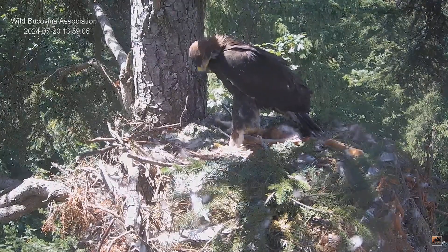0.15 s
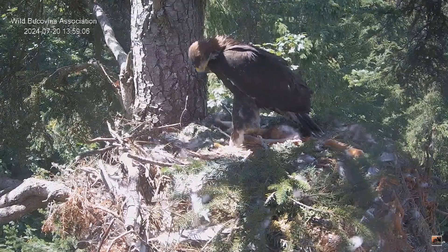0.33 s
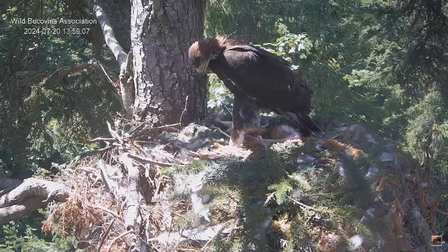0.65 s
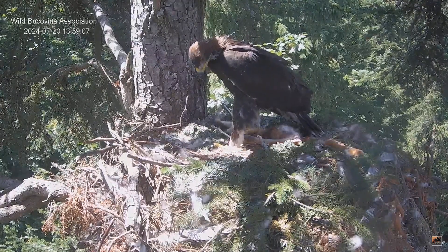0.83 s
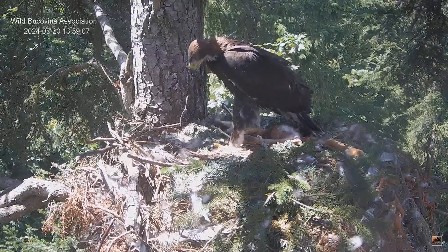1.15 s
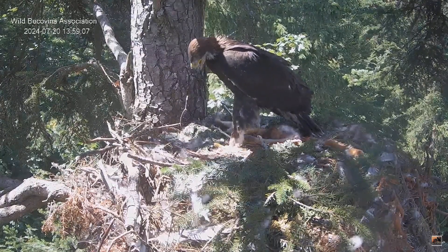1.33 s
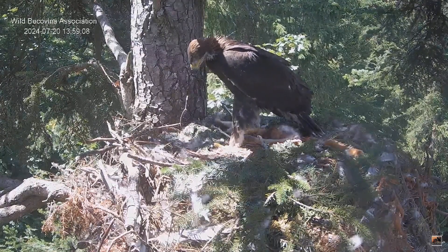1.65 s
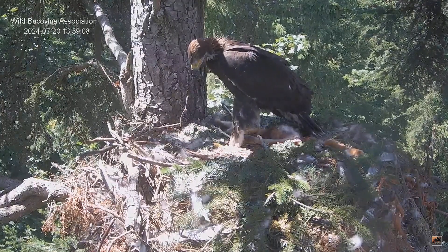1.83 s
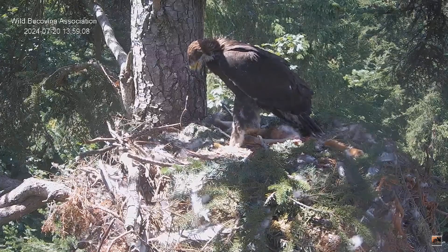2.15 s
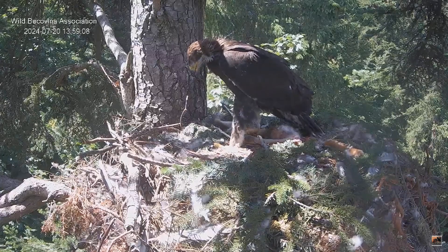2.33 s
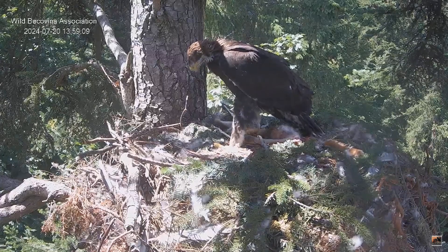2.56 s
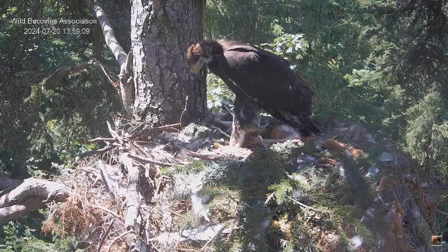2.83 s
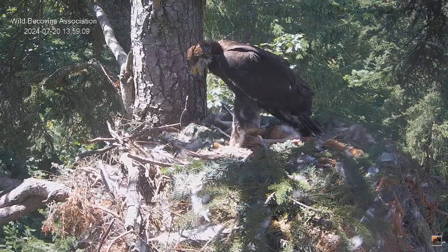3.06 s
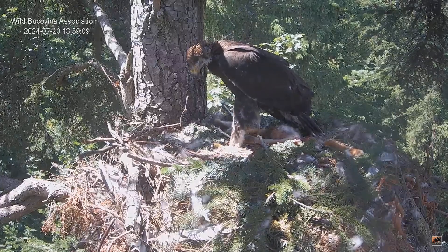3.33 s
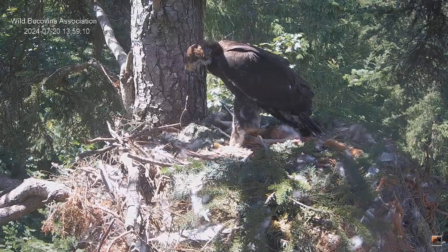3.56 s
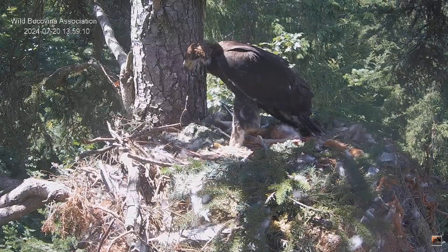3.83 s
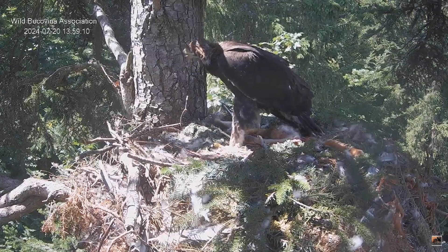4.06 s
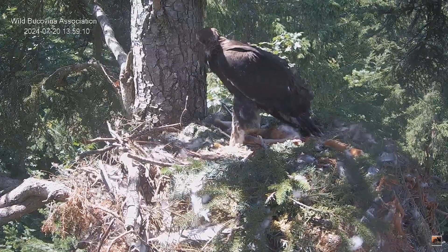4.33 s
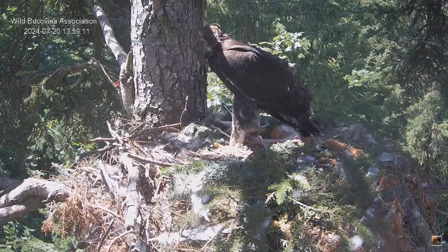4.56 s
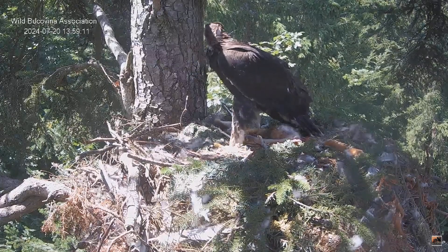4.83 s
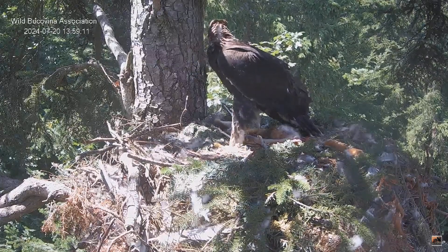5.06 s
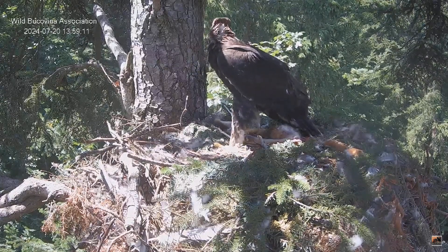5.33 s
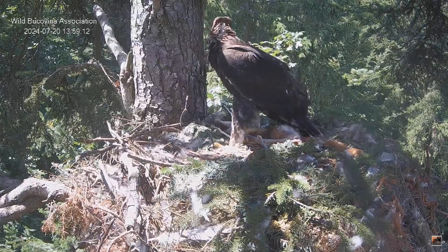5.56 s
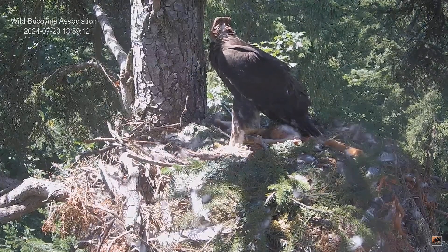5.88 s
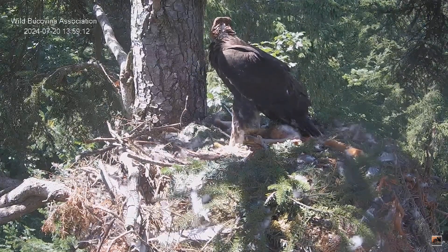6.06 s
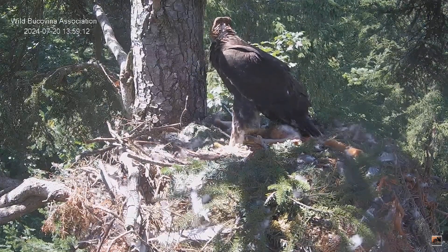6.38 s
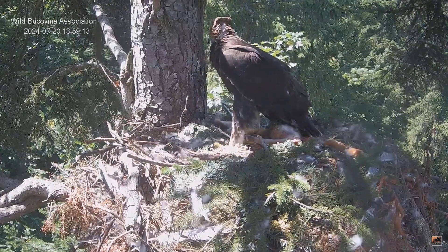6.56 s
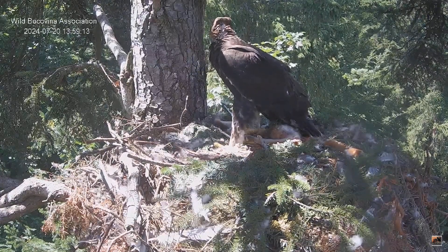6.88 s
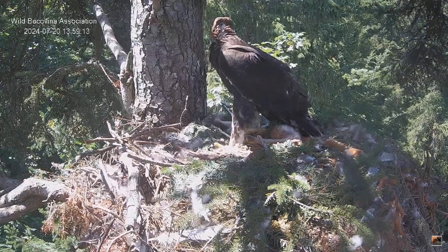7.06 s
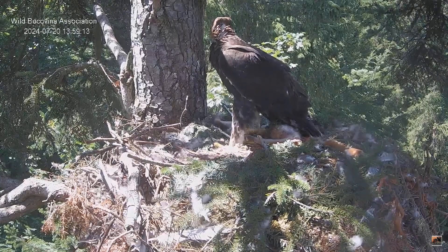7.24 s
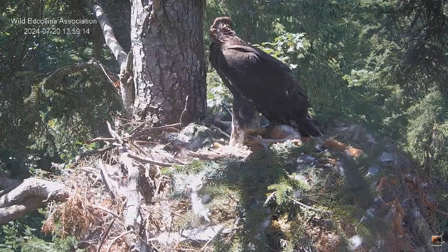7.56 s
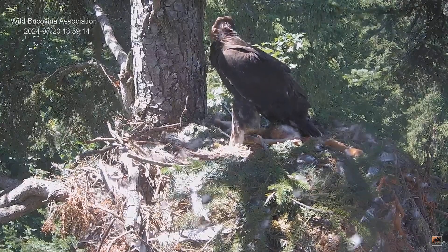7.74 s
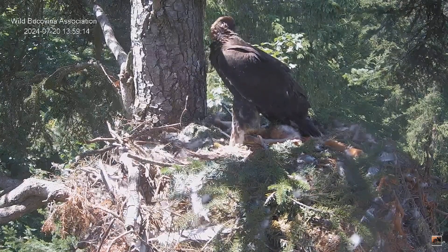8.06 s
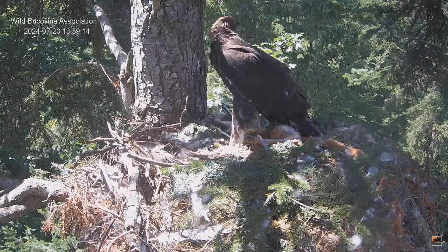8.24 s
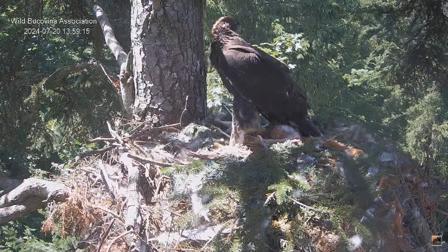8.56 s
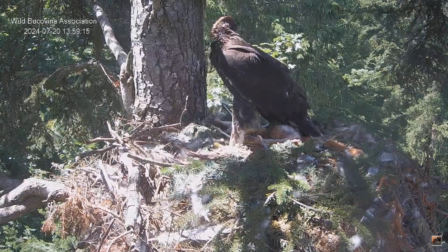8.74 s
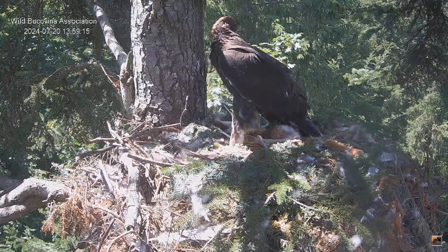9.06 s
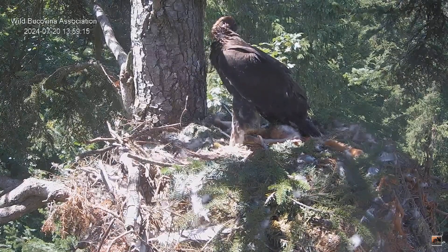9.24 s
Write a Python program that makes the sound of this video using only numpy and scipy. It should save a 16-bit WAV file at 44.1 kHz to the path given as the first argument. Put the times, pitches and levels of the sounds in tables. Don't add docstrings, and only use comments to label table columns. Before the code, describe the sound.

At 0 s the buzzy tail of a young eagle's cry is just fading, while a few very faint croaks sound far off until 0.3 s. From 0.4 s the close bird gives twelve begging calls, at about 0.4, 1.3, 2.1, 2.9, 3.8, 4.5, 5.2, 5.9, 6.7, 7.4, 8.1 and 8.8 s. Each lasts around 0.4 s: a tiny throat creak, a fast upward catch into a loud, nearly pure whistle near 4.7 kHz, creeping higher for 0.2 s, then a sudden crack down through a brief note near 2.3 kHz to a raspy, drooping one near 1.3 kHz. After 4.3 s the head turns away, so the low tails dull and soft forest echoes show more. Another faint croak comes near 4.9 s. Low wind thumps swell gently underneath, strongest around 4.6, 6.9, 7.9 and 9.1 s, over a faint airy floor.

```python
import sys
import numpy as np
from scipy import signal
from scipy.fft import rfft, irfft, next_fast_len
from scipy.io import wavfile
from scipy.ndimage import uniform_filter1d, minimum_filter1d, map_coordinates

SR = 44100
rng = np.random.default_rng(int(sys.argv[2]) if len(sys.argv) > 2 else 0)


def convert_level_to_amplitude(level_db):
    exponent = np.asarray(level_db, float) / 20
    return 10 ** exponent


def wav_out(sig):
    wavfile.write(sys.argv[1], SR, np.round(np.clip(np.atleast_2d(sig).T, -1, 1) * 32767).astype(np.int16))


N = 414981
TIME = np.arange(N) / SR
OVERLAP_S = 0.0086

# start_s, snap_s, rise_s, settling_pitch_hz, last_pitch_hz
WHISTLE_CALLS = [(0.388, 0.611, 0.027, 4637, 4820), (1.255, 1.488, 0.031, 4660, 4842),
                 (2.1, 2.329, 0.031, 4654, 4815), (2.895, 3.115, 0.025, 4646, 4839),
                 (3.766, 3.994, 0.039, 4776, 4884), (4.52, 4.75, 0.022, 4655, 4848),
                 (5.191, 5.418, 0.022, 4660, 4968), (5.892, 6.125, 0.019, 4707, 5013),
                 (6.69, 6.918, 0.025, 4650, 5013), (7.38, 7.601, 0.022, 4782, 4946),
                 (8.064, 8.298, 0.019, 4766, 4973), (8.795, 9.032, 0.021, 4696, 5018)]
# octave_db, half_pitch_line_db, flutter_db, air_db
WHISTLE_COMPANIONS = [(-28, -48.5, -63.5, -42.5), (-28, -54, -64, -46), (-28.5, -51, -65.5, -44.5),
                      (-25.5, -41, -61, -40), (-28, -38, -66.5, -42), (-24, -44.5, -80.5, -45),
                      (-29, -50.5, -64, -52.5), (-30, -53, -61, -49), (-29.5, -59, -60.5, -49),
                      (-31.5, -52, -42.5, -44), (-35.5, -58, -51.5, -47), (-36, -76, -58, -44.5)]
# peak_s, peak_db, rise_s, fall_s
AIR_PUSHES = [(0.403, -23.0, 0.008, 0.005), (0.414, -22.5, 0.0031, 0.0048), (0.423, -20.0, 0.0064, 0.13),
              (0.596, -8.5, 0.077, 0.004), (1.287, -12.5, 0.019, 0.01), (1.303, -13.5, 0.009, 0.023),
              (1.335, -8.0, 0.021, 0.041), (1.387, -9, 0.027, 0.029), (1.447, -3.5, 0.045, 0.033),
              (2.122, -21.5, 0.013, 0.017), (2.146, -9.5, 0.015, 0.041), (2.151, -13.5, 0.0064, 0.05),
              (2.314, -11.5, 0.13, 0.02), (2.924, -16, 0.017, 0.17), (3.033, -5, 0.094, 0.019),
              (3.058, -4, 0.023, 0.062), (3.093, -6, 0.035, 0.037), (3.795, -12.5, 0.02, 0.0053),
              (3.809, -15.0, 0.0093, 0.038), (3.84, -7.5, 0.034, 0.1), (3.975, 2, 0.086, 0.012),
              (4.566, -13.5, 0.023, 0.074), (4.728, -11.0, 0.059, 0.047), (5.204, -24.5, 0.012, 0.014),
              (5.22, -15.5, 0.0069, 0.019), (5.317, -9, 0.082, 0.068), (5.394, -12.5, 0.075, 0.038),
              (5.897, -28, 0.006, 0.022), (5.927, -12.5, 0.017, 0.016), (6.01, -7.5, 0.065, 0.028),
              (6.069, -13.5, 0.035, 0.018), (6.102, -22.5, 0.023, 0.01), (6.709, -28.5, 0.009, 0.016),
              (6.734, -11, 0.017, 0.04), (6.823, -8.5, 0.045, 0.042), (6.892, -13, 0.029, 0.022),
              (7.392, -23.5, 0.01, 0.017), (7.418, -9.5, 0.019, 0.013), (7.445, -9.5, 0.012, 0.035),
              (7.55, -15.5, 0.064, 0.019), (7.577, -23, 0.019, 0.008), (7.592, -19, 0.0069, 0.08),
              (8.101, -7.5, 0.023, 0.017), (8.128, -15.5, 0.019, 0.085), (8.226, -17.5, 0.036, 0.041),
              (8.278, -10.0, 0.042, 0.01), (8.806, -22.5, 0.005, 0.032), (8.839, -7, 0.028, 0.021),
              (8.855, -23.5, 0.017, 0.059), (8.994, -11.0, 0.085, 0.042)]
# time_s, bend_hz, width_s
PITCH_BENDS = [(.45, 71.5, .03), (.55, -21.5, .03), (1.32, 49, .02), (1.436, 86.5, .028), (2.168, 61, .025),
               (2.937, 59.5, 0.016), (3.061, -18.5, 0.031), (3.833, 110.5, .02), (4.589, 18.5, 0.043),
               (5.24, 40, .02), (5.94, -50, .012), (6.09, 41, .02), (6.871, -26, .03), (7.47, 29.5, .03),
               (8.18, -35.5, .04), (8.91, -38, .03), (9, 39, 0.023)]
# jolt_db, midway_pitch_hz, crack_foot_db, middle_octave_db
VOICE_BREAKS = [(-31, 3900, -19.5, -8), (-12, 3250, -21.5, -6), (-10.5, 3200, -12.5, -12.5),
                (-18.5, 4100, -10, -23.5), (-18, 3300, -10, -11), (-12.5, 2700, -15.5, 1),
                (-16, 3250, -11, -6.5), (-7.5, 3100, -7.5, -7), (-10, 3150, -6.5, -10), (-9, 3050, 1.5, 2),
                (-9, 3250, -15.5, -4), (-28, 3400, -15.5, -5.5)]
# landing_s, end_s, pitch_hz, landing_db, last_db
MIDDLE_NOTES = [(0.638, 0.659, 2445, -7, -11), (1.511, 1.528, 2473, -13, -11.5),
                (2.37, 2.385, 2465, -4, -18.5), (3.162, 3.173, 2430, -14.5, -10.5),
                (4.027, 4.075, 2348, -10, -13), (4.785, 4.832, 2260, -14.5, -18),
                (5.464, 5.512, 2166, -7.5, -12), (6.172, 6.21, 2140, -6.5, -6),
                (6.971, 7.019, 2136, -0.5, -6), (7.651, 7.689, 2187, -22, -6.5),
                (8.338, 8.378, 2207, -6.5, -3.5), (9.067, 9.111, 2214, 0.5, -8)]
# end_s, first_pitch_hz, last_pitch_hz, level_db, octave_db
LOW_NOTES = [(0.062, 1540, 1186, -23, 3.5), (0.743, 1651, 1237, -10, 4), (1.621, 1688, 1207, -10.5, 2.5),
             (2.465, 1670, 1226, -13, 2), (3.26, 1700, 1263, -15, 4.5), (4.144, 1509, 1114, -16.5, 5),
             (4.881, 1428, 1159, -22, 4.5), (5.561, 1371, 1093, -21, 5), (6.261, 1380, 1120, -19, 5),
             (7.063, 1345, 1080, -20.5, 4), (7.739, 1372, 1111, -16.5, 7.5),
             (8.437, 1406, 1100, -23.5, 5.5), (9.165, 1402, 1143, -22.5, 5)]
# beak_toward_microphone_db, half_pitch_lines_db
HEAD_POSES = [(-0.5, -22), (2, -17), (1.5, -10), (1, -7.5), (-0.5, -5), (-1.5, -41.5), (-0.5, -21),
              (-9, -20.5), (-12, -16.5), (-11.5, -16.5), (-6, -24), (-7.5, -19), (-7, -18)]
# frequency_hz, level_db
THROAT_SPECTRUM = [(700, -32.5), (1500, -13.5), (3200, -4), (4600, -7.5), (6300, -6), (8200, -10),
                   (10500, -21), (14500, -39)]
# frequency_hz, level_db
BREATH_SPECTRUM = [(1300, -38), (2200, -24), (3600, -13), (4800, -1), (5800, -7), (7600, -4.5),
                   (9500, -13.5), (15000, -37)]
# frequency_hz, level_db
RASP_SPECTRUM = [(900, -21), (3500, 2), (7500, -1), (10500, -13), (14000, -32)]
# start_s, peak_db, ring_hz
THROAT_CREAKS = [(0.368, -33, 858), (1.233, -36.5, 956), (2.077, -32.5, 907), (2.879, -41, 1793),
                 (3.744, -40.5, 848), (4.499, -54, 1097), (5.168, -28, 1073), (5.868, -34, 1565),
                 (6.671, -24.5, 1386), (7.361, -33, 1604), (8.041, -33, 1010), (8.773, -32, 1006)]
# frequency_hz, t60_s
FOREST_DECAY = [(1500, 0.5), (5000, 0.48), (10000, 0.26)]
# centre_s, level_db, pitch_hz
FAR_CROAKS = [
    (.1, -58, 630),
    (.18, -54.5, 257),
    (.17, -65, 700),
    (.24, -65, 630),
    (.31, -69, 607),
    (.33, -65, 245),
    (1.06, -63, 244),
    (4.935, -59.5, 579.6),
]
# peak_s, buffet_db, rise_s, fall_s
GUSTS = [(0.01, -84, 0.02, 0.02), (0.335, -71.5, 0.34, 0.418), (0.504, -58, 0.038, 0.039),
         (0.579, -63, 0.051, 0.071), (0.693, -65, 0.098, 0.22), (0.944, -82, 0.031, 0.034),
         (1.155, -62, 0.088, 0.11), (1.389, -64.5, 0.08, 0.07), (1.49, -71, 0.034, 0.088),
         (2.27, -70.5, 0.22, 0.468), (2.453, -47.5, 0.11, 0.021), (2.475, -50.5, 0.02, 0.16),
         (2.788, -55.5, 0.065, 0.103), (2.961, -45.5, 0.086, 0.026), (3.012, -54, 0.053, 0.051),
         (3.099, -54, 0.072, 0.069), (3.161, -48.5, 0.034, 0.061), (3.262, -61, 0.072, 0.099),
         (3.546, -67.5, 0.046, 0.047), (3.75, -79.5, 0.03, 0.62), (4.187, -44, 0.35, 0.048),
         (4.255, -48.5, 0.06, 0.038), (4.308, -48, 0.129, 0.233), (4.418, -57.5, 0.02, 0.46),
         (4.647, -36, 0.074, 0.047), (4.726, -41, 0.047, 0.078), (4.889, -68.5, 0.419, 0.141),
         (5.04, -67, 0.088, 0.269), (5.239, -49, 0.101, 0.111), (5.74, -78.5, 0.706, 0.39),
         (6.046, -48, 0.086, 0.12), (6.166, -42.5, 0.072, 0.251), (6.559, -64.5, 0.34, 0.091),
         (6.69, -60, 0.098, 0.052), (6.749, -49.5, 0.047, 0.09), (6.864, -35.5, 0.051, 0.027),
         (6.913, -41, 0.037, 0.14), (7.108, -41.5, 0.11, 0.048), (7.192, -41.5, 0.059, 0.063),
         (7.251, -48, 0.039, 0.28), (7.568, -41, 0.1, 0.22), (7.894, -32.5, 0.14, 0.083),
         (7.993, -37.5, 0.025, 0.13), (8.276, -54.5, 0.179, 0.071), (8.452, -66.5, 0.133, 0.608),
         (8.977, -39, 0.16, 0.461), (9.135, -32.5, 0.091, 0.054), (9.226, -37.0, 0.051, 0.27)]
# frequency_hz, level_db_per_hz
RUMBLE_SPECTRUM = [(12, -30.5), (20, 7), (106, -12), (454, -41.5), (900, -61.5), (1170, -90.5),
                   (1980, -120)]
# frequency_hz, level_db_per_hz
AIR_SPECTRUM = [(88, -34.5), (150, 1), (7680, -10.5), (13400, -11.5), (15100, -23)]


def eagle():
    middles = [middle_note(*call) for call in zip(WHISTLE_CALLS, MIDDLE_NOTES, VOICE_BREAKS)]
    late_s = .0025
    low_starts = [0] + [row[1] - OVERLAP_S + late_s for row in MIDDLE_NOTES]
    lows = [low_note(*call) for call in zip(low_starts, LOW_NOTES)]
    middle = register(middles, HEAD_POSES[1:], upper_db=-4, half_db=-8, jitter=.0035, air_db=-24)
    low = register(lows, HEAD_POSES, upper_db=5, half_db=0, jitter=.006, air_db=-19)
    return whistle() + sputter() + middle + low


def whistle():
    tone, flow = np.zeros(N), np.zeros(N)
    catch_hz, rise_shape, climb_shape, drift_hz = 3040, 1.2, 1.8, 12
    jolt_s, snap_s, snap_dip_hz, die_db = .009, 0.0032, 170, 18
    jolts = [(row[1] - jolt_s, snap[0], snap_s, snap_s) for row, snap in zip(WHISTLE_CALLS, VOICE_BREAKS)]
    bend_hz = sum(hz * np.exp(-((TIME[::64] - s) / width) ** 2) for s, hz, width in PITCH_BENDS).repeat(64)
    level_db = swells(AIR_PUSHES + jolts, under_db=-31.5, round_by=0.84)
    for call, companions in zip(WHISTLE_CALLS, WHISTLE_COMPANIONS):
        start, end, rise, settle_hz, top_hz = call
        octave_db, half_db, flutter_db, air_db = companions
        span, edge, (gone,) = read([(start, 0), (end, 1)], ramp=.004)
        n, t, db = len(edge), np.abs(TIME[span] - start), level_db[span]
        age = np.arange(n) / SR
        past_end = t - (end - start)

        aim = settle_hz + (top_hz - settle_hz) * gone ** climb_shape
        aim = aim + drift_hz * wobble(45, size=n) + bend_hz[span]
        pitch = aim - (aim - catch_hz) * np.exp(-(t / rise) ** rise_shape)
        pitch -= snap_dip_hz * np.clip((past_end + jolt_s) / snap_s + 1, 0, 2.5)
        phase = 2 * np.pi * np.cumsum(pitch * (1 + .0015 * wobble(400, size=n))) / SR

        edge = edge * convert_level_to_amplitude(-die_db * np.clip(past_end / jolt_s + 0.98, 0, 1))
        swell = edge * np.clip(age / 0.029, 0, 1) * convert_level_to_amplitude(np.minimum(db + 28.5, 0))
        tremor = .6 * wobble(160, size=n) + .36 * wobble(900, size=n) + .06 * wobble(3000, size=n)
        tremor += .5 * np.sin(2 * np.pi * np.cumsum(210 + 25 * wobble(30, size=n)) / SR) ** 3
        note = edge * convert_level_to_amplitude(db + tremor) * np.sin(phase)

        second_db = octave_db + 3.8 * wobble(49, size=n) + (pitch - 4800) / 200
        second_db -= 22 * np.clip(past_end / jolt_s + 0.96, 0, 1) + np.maximum(4200 - pitch, 0) / 250
        note += swell * convert_level_to_amplitude(second_db) * np.sin(2 * phase)
        third_db = 1.9 * octave_db + 2.0 + 4.5 * wobble(40, size=n)
        third_db -= np.maximum(pitch - 4650, 0) / 18 + np.maximum(4300 - pitch, 0) / 70
        note += swell * convert_level_to_amplitude(third_db) * np.sin(3 * phase)

        swell_late = swell * np.clip(age / 0.058 - 1, 0, 1)
        half_line = np.sin(1.5 * phase + wobble(150, size=n))
        note += swell_late * convert_level_to_amplitude(half_db + 7 * wobble(60, size=n)) * half_line
        beat = 2 * np.pi * np.cumsum(1330 + 130 * wobble(220, size=n)) / SR
        flutter = np.sin(phase - beat) + convert_level_to_amplitude(-6) * np.sin(phase + beat)
        note += swell_late * convert_level_to_amplitude(flutter_db + 7.4 * wobble(90, size=n)) * flutter

        tone[span] += np.sqrt(2) * note
        flow[span] += swell * convert_level_to_amplitude(air_db - 0.5 + .42 * (db + 11))
    return tone + flow * streaky(BREATH_SPECTRUM, patchy_db=7)


def sputter():
    out, t = np.zeros(N), np.arange(SR // 16) / SR
    n = len(t)
    puff = streaky(BREATH_SPECTRUM, patchy_db=6)
    fade = np.sin(np.pi * t / t[-1]) ** .5
    for _, end, _, _, hz in WHISTLE_CALLS:
        start = int((end - .006) * SR)
        phase = 2 * np.pi * np.cumsum(hz * (1 + .012 * wobble(400, size=n))) / SR
        out[start:][:n] += fade * convert_level_to_amplitude(-23.5 - 500 * t + 2.9 * wobble(150, size=n)) * np.sin(phase)
        out[start:][:n] += fade * convert_level_to_amplitude(-31 - 600 * t) * puff[start:][:n]
    return out


def middle_note(high, row, snap):
    land, end, hz, db, last_db = row
    _, bend_hz, foot_db, octave_db = snap
    crack_hz, foot_hz, crack_db, crack_octave_db = 4130, 2576, -28, -15.5
    start = high[1] + 0.0028
    last_hz = hz - 2700 * (end - land)
    give_way = end - OVERLAP_S

    def at(share):
        return start + share * (land - start)

    return [(start, crack_hz, crack_db, crack_octave_db),
            (at(.45), bend_hz, crack_db + 4.0, crack_octave_db),
            (at(.76), foot_hz, foot_db, crack_octave_db),
            (at(.9), .97 * foot_hz, foot_db - 5, crack_octave_db),
            (land, 1.015 * hz, db, octave_db),
            (min(land + .011, (land + give_way) / 2), .99 * hz, db - 1.5, octave_db),
            (give_way, last_hz, last_db, octave_db),
            (end, last_hz, -39, octave_db)]


def low_note(start, row):
    end, hz, last_hz, db, octave_db = row
    faded_db, release_s = -33.5, 0.016
    fallen = .76 - (end - start) / .27
    return [(start, 1.06 * hz, db - 2, octave_db - 17),
            (start + 0.0066, hz, db + 0.5, octave_db),
            (start + .014, hz + .1 * (last_hz - hz), db - 2.5, octave_db),
            (start + .6 * (end - start), hz + fallen * (last_hz - hz), .55 * db + 0.56 * faded_db, octave_db),
            (end - release_s, 1.07 * last_hz, faded_db, octave_db),
            (end, last_hz, faded_db - 7.0, octave_db - 13)]


def register(tables, poses, upper_db, half_db, jitter, air_db):
    tone, flow = np.zeros(N), np.zeros(N)
    for rows, (facing_db, sub_db) in zip(tables, poses):
        span, edge, (pitch, db, octave_db) = read(rows, ramp=.005)
        n = len(edge)
        crack = np.clip((pitch - 2480) / 350, 0, 1)
        shake = (jitter + .05 * crack) * wobble(500, size=n)
        phase = 2 * np.pi * np.cumsum(pitch * (1 + shake)) / SR
        second_db = octave_db + (2 + 7 * crack) * wobble(130, size=n) - 8 * crack
        note = np.sin(phase) + convert_level_to_amplitude(second_db) * np.sin(2 * phase + 1)
        uneven_db = 2 + 5 * np.tanh(wobble(40, size=n))
        for k in np.arange(.5, 12, .5):
            if k in (1, 2):
                continue
            hz = k * pitch
            halfway = k % 1 > 0
            gain_db = upper_db + along(THROAT_SPECTRUM, hz) + facing_db * np.clip(np.log2(hz / 2500), 0, 2)
            gain_db = gain_db + halfway * (sub_db + half_db + uneven_db)
            gain_db = gain_db + 10.5 * np.tanh(.75 * wobble(130, size=n)) - 10 * crack
            gain_db = gain_db + .35 * (db - db.max())
            angle = k * phase + k * k + halfway * .6 * wobble(200, size=n)
            note += convert_level_to_amplitude(gain_db) * (hz < 15000) * np.sin(angle)
        flicker_db = (2 + 5 * crack) * np.tanh(wobble(200, size=n))
        tone[span] -= np.sqrt(2) * edge * convert_level_to_amplitude(db + flicker_db) * note
        flow[span] += edge * convert_level_to_amplitude(.86 * db + air_db + 1.2 * facing_db)
    return tone + flow * streaky(RASP_SPECTRUM, patchy_db=7.5)


def creaks():
    out, t = np.zeros(N + SR), np.arange(SR // 25) / SR
    attack = 1 - np.exp(-t / .0008)
    for s, db, hz in THROAT_CREAKS:
        for k, step_db in enumerate((-6.5, 3, -1.5, -6.5)):
            ring = 0
            for ring_hz, ring_db in ((hz, -1), (2000, -4)):
                tone = np.sin(2 * np.pi * ring_hz * rng.uniform(.9, 1.1) * t)
                ring = ring + convert_level_to_amplitude(ring_db - 60 * t / .011) * attack * tone
            start = round((s + k * .0046 + rng.normal(0, .0005)) * SR)
            out[start:][:len(t)] += convert_level_to_amplitude(db + step_db + 4.0) * ring
    return out[:N]


def trunk(x):
    def response(hz):
        echo = convert_level_to_amplitude(-10.5) * np.exp(-((hz - 3700) / 700) ** 2)
        echo = echo + convert_level_to_amplitude(-5.5) * np.exp(-((hz - 7600) / 1100) ** 2)
        low_cut = 1 + (330 / (hz + 1)) ** 4
        return (1 + echo * np.exp(-2j * np.pi * hz / 480)) / low_cut

    return filtered(x, response)


def forest(x):
    hz, t, z = signal.stft(rng.standard_normal(SR * 2 // 3), SR, nperseg=256)
    decay = convert_level_to_amplitude(-60 * t / along(FOREST_DECAY, hz)[:, None]) + convert_level_to_amplitude(7 - 60 * t / .1)
    decay *= convert_level_to_amplitude(3 * np.log2(np.clip(hz, 800, 6000) / 3000))[:, None]
    tail = signal.istft(z * decay, SR, nperseg=256)[1]
    return signal.fftconvolve(np.pad(x, (300, 0)), tail / np.linalg.norm(tail))[:N]


def far_birds():
    out, half = np.zeros(N), 2000
    t = np.arange(-half, half) / SR
    for s, db, hz in FAR_CROAKS:
        croak = np.exp(-(t / 0.01) ** 2) * np.sin(2 * np.pi * hz * t)
        out += convert_level_to_amplitude(db) * np.pad(croak, (int(s * SR) - half, N))[:N]
    return out


def wind():
    gust_db = swells(GUSTS, under_db=-85.5, round_by=1.5)
    push = hiss(RUMBLE_SPECTRUM)
    push = unit(push / np.sqrt(np.abs(uniform_filter1d(push ** 2, 3000)) + .05))
    flap = convert_level_to_amplitude(0.55 * gust_db + 6.5 + 2.4 * wobble(22)) * hiss([(60, -19.0), (170, 0.0), (1500, -60.5)])
    floor = convert_level_to_amplitude(-74.0 + wobble(7.7)) * hiss(AIR_SPECTRUM)
    return convert_level_to_amplitude(gust_db + 2.5 * wobble(40)) * (push + flap) + floor


def swells(rows, under_db, round_by):
    total = np.full(N, convert_level_to_amplitude(under_db) ** 2)
    for s, db, rise, fall in rows:
        span = slice(max(int((s - rise) * SR), 0), int((s + fall) * SR))
        u = (TIME[span] - s) / np.where(TIME[span] < s, rise, fall)
        total[span] += (convert_level_to_amplitude(db) * np.abs(np.cos(np.pi / 2 * u)) ** round_by) ** 2
    return 10 * np.log10(total)


def streaky(spectrum, patchy_db):
    z = signal.stft(hiss(spectrum), nperseg=256)[2]
    field = uniform_filter1d(rng.standard_normal(z.shape), 2, 0)
    field = uniform_filter1d(field, 10, 1)
    return unit(signal.istft(z * convert_level_to_amplitude(patchy_db * unit(field)), nperseg=256)[1][:N])


def hiss(spectrum):
    return unit(filtered(rng.standard_normal(N), lambda hz: convert_level_to_amplitude(along(spectrum, hz))))


def filtered(x, response):
    m = next_fast_len(N + SR // 2)
    return irfft(rfft(x, m) * response(np.fft.rfftfreq(m, 1 / SR)), m)[:N]


def read(rows, ramp):
    s, *cols = np.transpose(rows)
    span = slice(int(s[0] * SR), int(s[-1] * SR))
    since = TIME[span] - s[0] + (s[0] == 0)
    edge = np.clip(np.minimum(since, s[-1] - TIME[span]) / ramp, 0, 1)
    return span, edge, [np.interp(TIME[span], s, c) for c in cols]


def wobble(rate, size=N):
    knots = rng.standard_normal(int(size * rate / SR) + 4)
    return map_coordinates(knots, [np.arange(size) * rate / SR])


def along(points, hz):
    f, v = np.transpose(points)
    return np.interp(np.log(hz + 1), np.log(f + 1), v)


def unit(x):
    return x / np.sqrt(np.mean(x ** 2) + 1e-20)


def scene():
    bird = trunk(eagle() + creaks())
    turned = TIME > 4.3
    beam = filtered(bird, lambda hz: np.exp(-((hz - 4920) / 220) ** 2)) * convert_level_to_amplitude(-15 - 23 * ~turned)
    echoes = forest(bird * convert_level_to_amplitude(np.where(turned, -21, -27)) + beam)
    return (bird + echoes + far_birds() + wind())[None]


def band_limit(x):
    return signal.sosfilt(signal.butter(12, 15240, fs=SR, output="sos"), x)


def record(dry):
    needed = np.minimum(1, 0.72 / (np.abs(dry) + 1e-9))
    gain = uniform_filter1d(minimum_filter1d(needed, 180), 90)
    mix = filtered(dry[0] * gain[0], lambda hz: 1 / (1 + (hz / 14500) ** 70))[None]
    return band_limit(mix)


dry = scene()
out = record(dry)
wav_out(out)
```